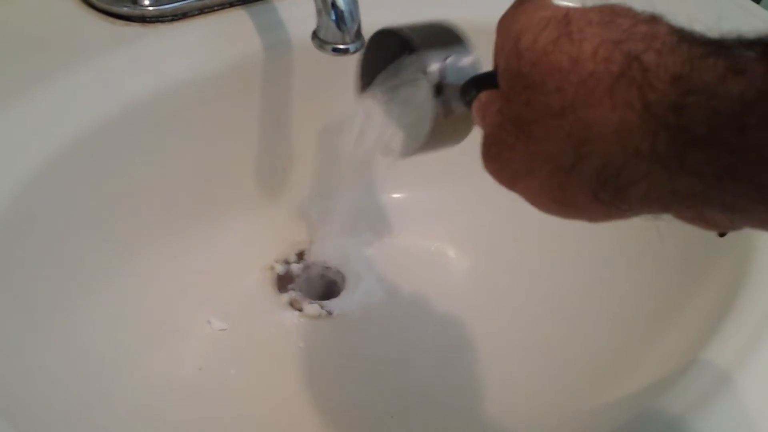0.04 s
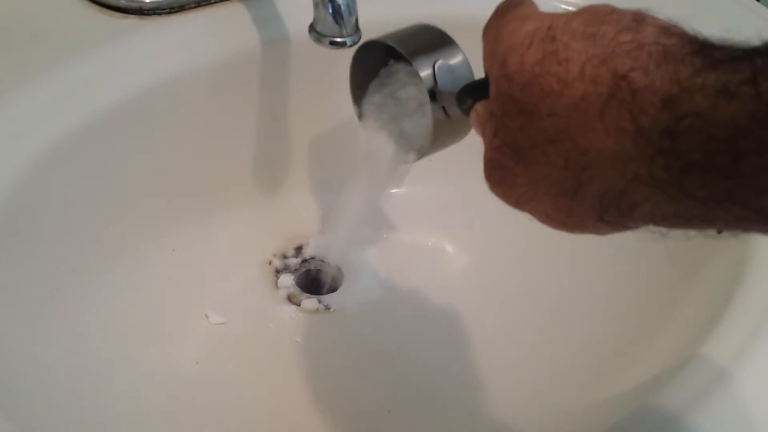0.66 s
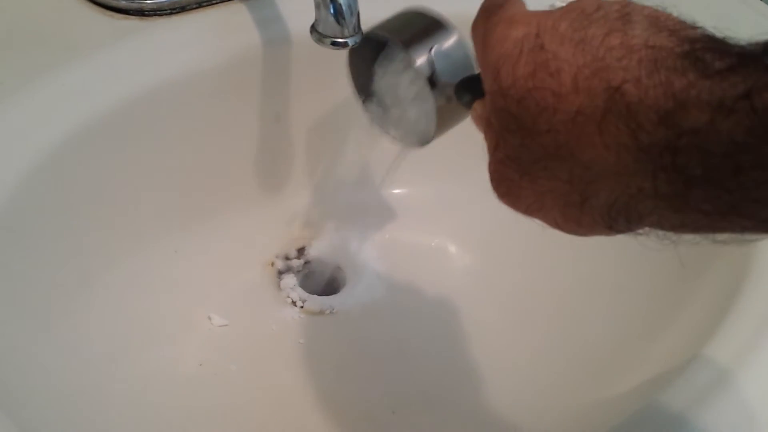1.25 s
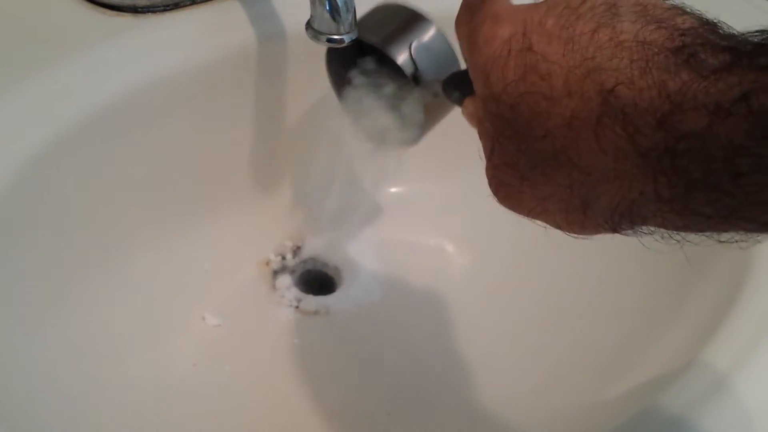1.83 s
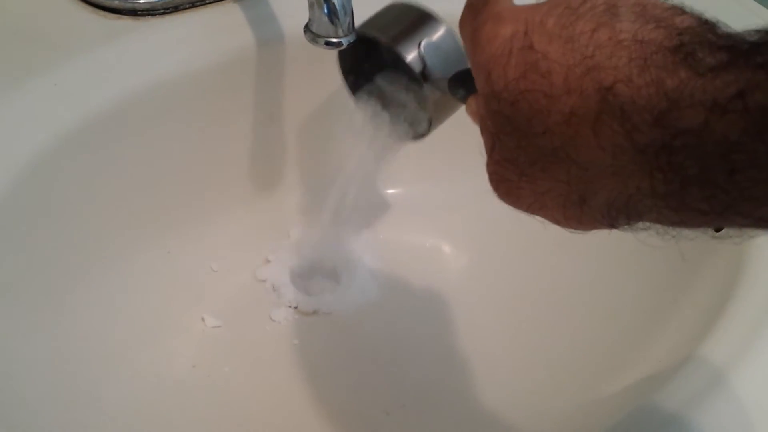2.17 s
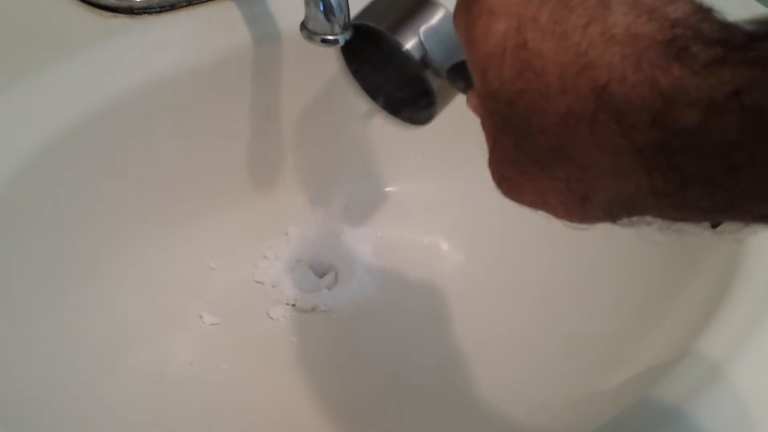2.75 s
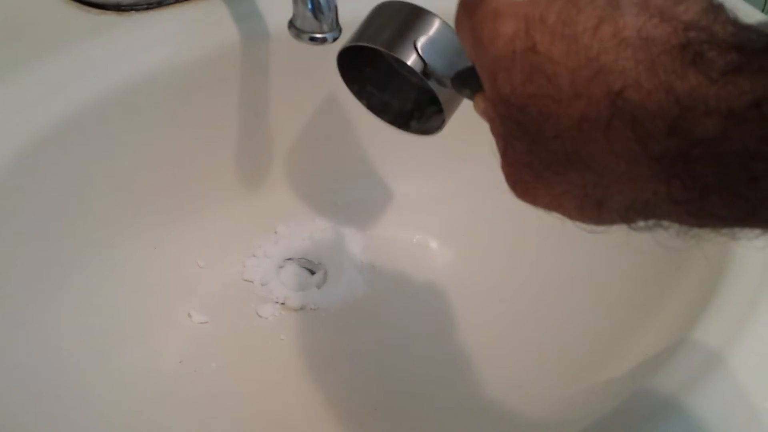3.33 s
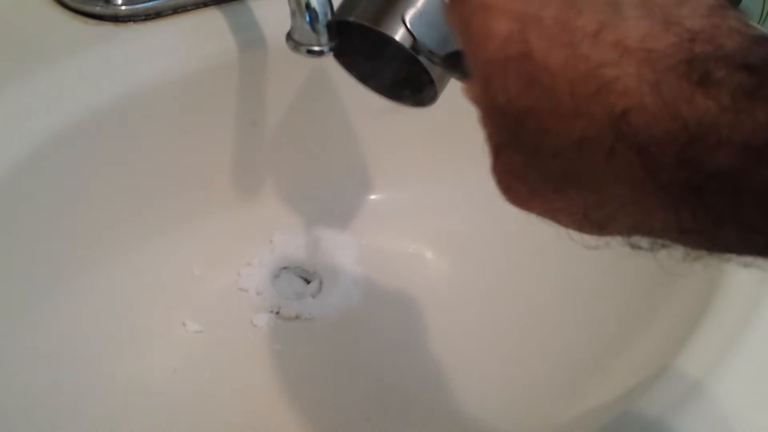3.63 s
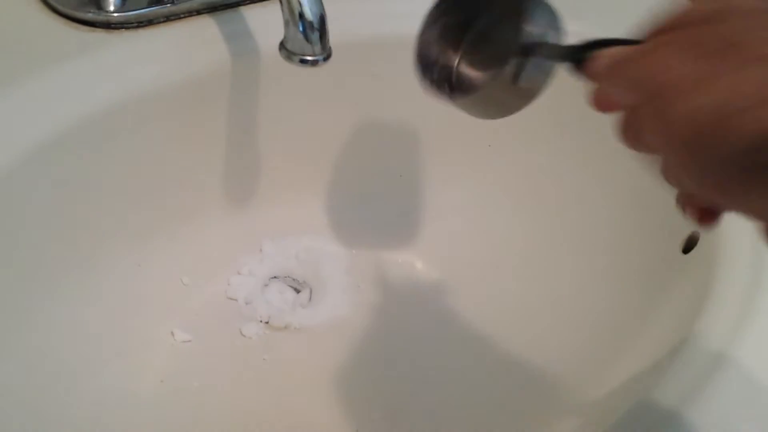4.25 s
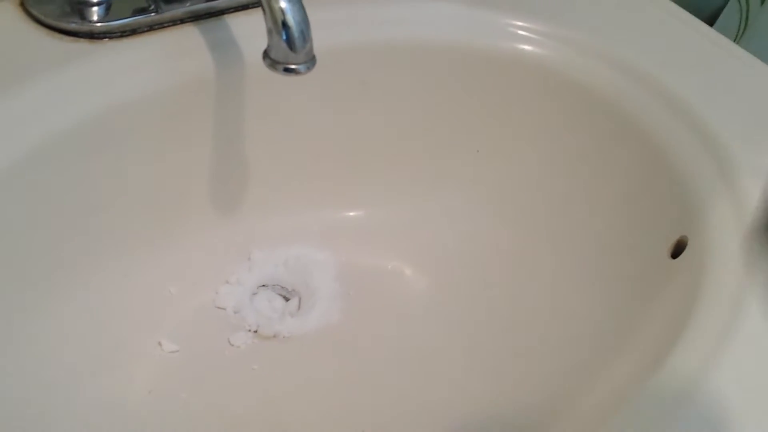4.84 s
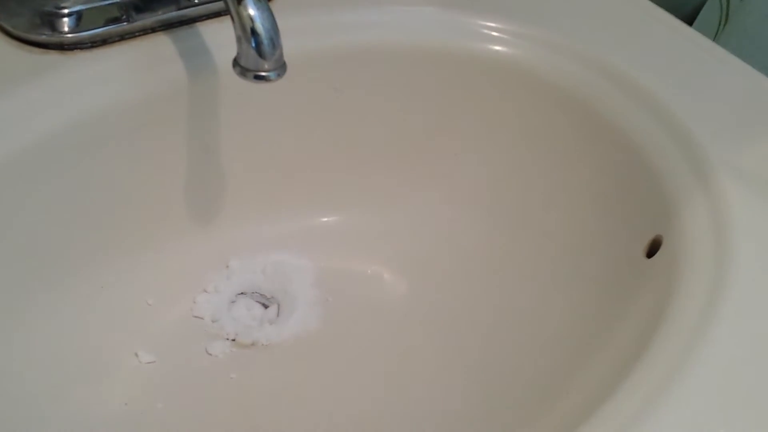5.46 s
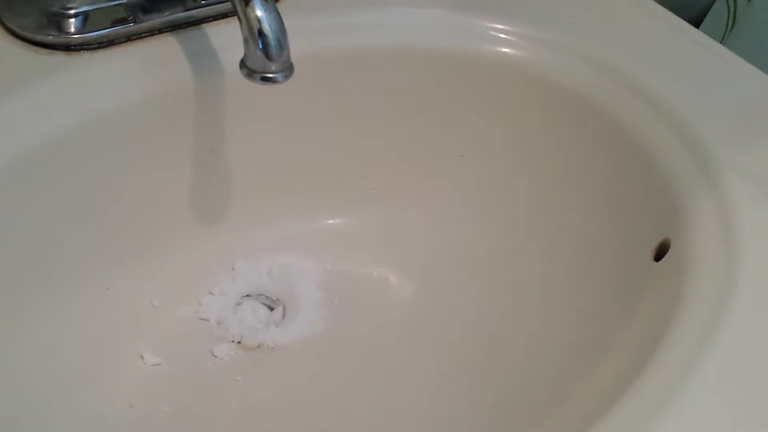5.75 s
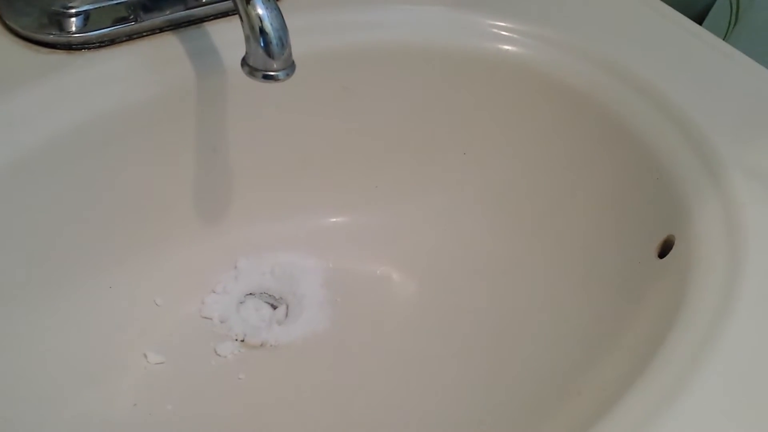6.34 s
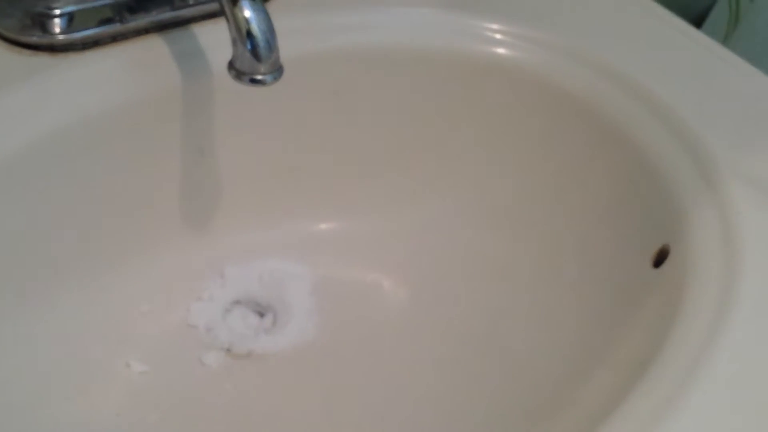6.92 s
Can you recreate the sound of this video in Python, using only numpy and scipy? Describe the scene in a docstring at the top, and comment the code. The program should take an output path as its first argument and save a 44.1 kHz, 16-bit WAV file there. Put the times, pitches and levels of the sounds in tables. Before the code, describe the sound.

Powder hisses faintly from a steel measuring cup, which is knocked four times on a tap with ringing clinks, then set on the counter.

```python
"""A bathroom sink in a small hard room, with a low ventilation hum and faint microphone hiss.
Powder shaken from a steel measuring cup hisses along the steel and patters into the basin.
Four knocks on the tap empty the cup: each clicks, rings the cup's modes and clanks tap and basin.
Set down on the counter, the cup clinks and rocks twice with a duller ring.
Basin and room answer every contact."""
import sys
import numpy as np
from scipy import signal
from scipy.fft import rfft, irfft, next_fast_len
from scipy.io import wavfile
from scipy.ndimage import map_coordinates

SR = 44100
rng = np.random.default_rng(int(sys.argv[2]) if len(sys.argv) > 2 else 0)


def to_wav(s):
    """Save 16-bit WAV."""
    ch = np.atleast_2d(s).T  # columns
    pcm = np.round(np.clip(ch, -1, 1) * 32767)  # PCM
    wavfile.write(sys.argv[1], SR, pcm.astype(np.int16))


N = 317114
EVENT_N = int(SR * .6)
AGE_S = np.arange(EVENT_N) / SR


def amp(db):
    """Decibels to gain."""
    return 10 ** (np.asarray(db) / 20)


def unit(x):
    """Scale to rms 1."""
    return x / np.sqrt(np.mean(x ** 2) + 1e-20)


def along(points, hz):
    """Interpolate (Hz, value) points on a log axis."""
    point_hz, values = np.transpose(points)
    return np.interp(np.log(hz + 1), np.log(point_hz + 1), values)


def tilted(spectrum, db_per_octave):
    """A colour (Hz to dB) sloped about 3 kHz."""
    return lambda hz: spectrum(hz) + db_per_octave * np.log2(np.clip(hz, 500, 10000) / 3000)


def band(centre_hz, octaves):
    """Colour of one band, 3 dB down at +/- octaves."""
    return lambda hz: -10 * np.log10(1 + (np.log2((hz + 1) / centre_hz) / octaves) ** 4)


def fade(t60_s):
    """Exponential decay, 60 dB down at t60_s."""
    return np.exp(-np.log(1000) * AGE_S / t60_s)


def pan(db):
    """Left and right gains of mean power 1."""
    gains = amp(np.array([db, -db]) / 2)
    return gains / np.sqrt(np.mean(gains ** 2, axis=0))


def add(track, start_s, sound):
    """Mix a sound in at start_s."""
    part = track[:, round(start_s * SR):][:, :sound.shape[-1]]
    part += sound[..., :part.shape[-1]]


def filtered(x, response):
    """Apply a frequency-dependent gain."""
    size = x.shape[-1]
    padded = next_fast_len(size + 8192)
    return irfft(rfft(x, padded) * response(np.fft.rfftfreq(padded, 1 / SR)), padded)[..., :size]


def wobble(rate_hz):
    """Two smooth random curves."""
    knots = rng.standard_normal((2, int(EVENT_N * rate_hz / SR) + 4))
    position = np.arange(EVENT_N) * rate_hz / SR
    return np.array([map_coordinates(row, [position], mode="nearest") for row in knots])


# Each row: frequency in Hz, left-right correlation 0-1.
COHERENCE = [(100, 0.94), (300, .9), (700, .55), (1400, 0), (5000, 0)]

def noise(size, colour):
    """Stereo noise of rms 1: alike in the bass, unrelated in the treble."""
    def mid_side_gains(hz):
        angle = np.arccos(np.clip(along(COHERENCE, hz), -1, 1)) / 2
        return amp(colour(hz)) * [np.cos(angle), np.sin(angle)]
    mid, side = filtered(rng.standard_normal((2, size)), mid_side_gains)
    return unit(np.array([mid + side, mid - side]))


def ring(modes, flutter_hz, weight_db=np.zeros_like, damping_db_per_s=0):
    """Decaying modes; reflections arriving out of step make each waver in level and phase."""
    out = np.zeros((2, EVENT_N))
    for hz, db, t60_s, rise_s, pan_db, waver in modes:
        alike = np.clip(along(COHERENCE, hz), 0, 1)
        left, other = (wobble(flutter_hz) + 1j * wobble(flutter_hz)) / np.sqrt(2)
        diffuse = np.array([left, alike * left + np.sqrt(1 - alike ** 2) * other])
        # short waves reach the two microphones out of step
        direct = np.exp(1j * (rng.uniform(0, 2 * np.pi) + np.arccos(alike) * np.array([[0], [1]])))
        phasor = np.sqrt(1 - waver ** 2) * direct + waver * diffuse
        tone = (phasor * np.exp(2j * np.pi * hz * AGE_S)).real
        damping = amp(-damping_db_per_s * (hz / 6000) ** 2 * AGE_S)
        envelope = fade(t60_s) * damping * (1 - np.exp(-AGE_S / rise_s))
        out += amp(db + weight_db(hz)) * pan(pan_db)[:, None] * envelope * tone
    return out


# Each row: frequency in Hz, room T60 in seconds.
ROOM_DECAY = [(100, 0.94), (500, 0.56), (2000, 0.33), (6000, 0.39), (14000, 0.073)]

def room_tail(colour):
    """Dense reflections; the treble dies first."""
    hz, t, spectra = signal.stft(noise(EVENT_N, colour), SR, nperseg=256)
    decay = np.exp(-np.log(1000) * t / along(ROOM_DECAY, hz)[:, None])
    return signal.istft(spectra * decay, SR, nperseg=256)[1][:, :EVENT_N]


def in_room(sound, wet_db):
    """A sound plus its reverberation."""
    tail = unit(room_tail(np.zeros_like)) / np.sqrt(EVENT_N)
    return sound + amp(wet_db) * signal.fftconvolve(sound, tail, axes=1)[:, :EVENT_N]


def puff(colour, t60_s):
    """A noise burst in the room."""
    return in_room(noise(EVENT_N, colour) * fade(t60_s), wet_db=-2) * pan(3)[:, None]


# Each row: frequency in Hz, left over right in dB.
BALANCE = [(100, 1.5), (380, 1.5), (1300, 3), (2400, 0.5), (5000, 4), (6800, -3), (8300, -8),
           (15000, -11.5)]

def placed(sound):
    """Pan by frequency: lows and mids left, top treble right."""
    return filtered(sound, lambda hz: pan(along(BALANCE, hz)))


def contact(colour, crack_t60_s, basin_db, room_db):
    """A hard click, its quick echoes in the basin, then the room."""
    crack = noise(EVENT_N, colour) * fade(crack_t60_s) * (1 - fade(0.00299))
    basin = noise(EVENT_N, colour) * fade(0.11) * (1 - fade(0.006))
    room = room_tail(colour) * (1 - fade(0.045))
    return placed(crack + amp(basin_db) * basin + amp(room_db) * room)


# Each row: frequency in Hz, relative density in dB.
HUM_SPECTRUM = [(20, -6.5), (40, -14.5), (62, -1), (90, -9.5), (125, -0.5), (150, -12), (174, 6.5),
                (198, -6.5), (235, 0), (290, -5.5), (450, -12), (800, -17.5), (1600, -25.5), (4000, -36)]
HISS_SPECTRUM = [(500, -20), (2000, -12.5), (4200, -10), (6000, -9), (7100, 0), (8200, -2.5), (9500, -9.5),
                 (12000, -13.5), (15300, -10.5), (15800, -40.5)]

def background():
    """Low ventilation hum and microphone hiss."""
    hum = amp(-59.5) * noise(N, lambda hz: along(HUM_SPECTRUM, hz)) * pan(2.2)[:, None]
    hiss = amp(-69.5) * noise(N, lambda hz: along(HISS_SPECTRUM, hz)) * pan(-.5)[:, None]
    return hum + hiss


# Each row: start in seconds, level in dB, centre in Hz, half-width in octaves, T60 in seconds.
FAINT_NOISES = [(.58, -71, 1440, 0.48, .86), (.71, -59.5, 1050, 0.22, .093), (1.183, -60, 1120, 0.27, .08),
                (1.342, -67, 1057, 0.038, 0.66), (1.36, -67.5, 2190, 0.42, 0.45),
                (3.301, -52.5, 997, 0.54, 0.02), (4.262, -56.5, 4900, 0.45, 0.12),
                (4.73, -62, 3996, 0.65, .08), (4.797, -51, 2920, .59, 0.019)]

def faint_noises():
    """Faint rubs and bumps of handling, and a narrow ring near 1 kHz, perhaps from the drain."""
    out = np.zeros((2, N))
    for start_s, db, centre_hz, octaves, t60_s in FAINT_NOISES:
        add(out, start_s, amp(db) * puff(band(centre_hz, octaves), t60_s))
    return out


# Each row: start in seconds, level in dB, tilt in dB per octave.
CLUMP_BREAKS = [(1.985, -49.5, .5), (2.059, -56.5, -4.5), (2.096, -52, 0), (2.123, -52, 1),
                (2.143, -57, 1.5), (2.314, -54, -5.5), (2.345, -55, -6), (2.615, -43.5, -2.5)]
# Each row: frequency in Hz, relative density in dB.
CLUMP_SPECTRUM = [(200, -7), (1000, -3), (3000, -4), (5000, -5), (7500, 9), (10000, -14), (15000, -25.5)]
# Each row: start in seconds, length in seconds.
CRUMB_FLURRIES = [(0.367, .14), (2.928, .14)]

def crumbs():
    """Clumps break on the basin; loose crumbs tick at random, three to a flurry."""
    out = np.zeros((2, N))
    for start_s, db, tilt in CLUMP_BREAKS:
        colour = tilted(lambda hz: along(CLUMP_SPECTRUM, hz), tilt)
        add(out, start_s, amp(db) * puff(colour, t60_s=0.0235))
    for start_s, length_s in CRUMB_FLURRIES:
        for tick_s in start_s + length_s * rng.random(size=3):
            db = rng.normal(-60, 1.5)
            add(out, tick_s, amp(db) * puff(band(centre_hz=7600, octaves=0.17), t60_s=0.014))
    return out


def grainy(spectrum, grain_db, rate_hz):
    """Noise whose level varies from grain to grain."""
    grains = rng.standard_normal(int(N * rate_hz / SR) + 4)
    sizes = map_coordinates(grains, [np.arange(N) * rate_hz / SR], order=1)
    return unit(noise(N, lambda hz: along(spectrum, hz)) * amp(grain_db * sizes))


# One slip of powder per shake, about eight a second. Each row: peak time in seconds, level in dB.
SLIPS = [(.93, -70), (1.035, -70), (1.29, -73), (1.41, -74), (1.552, -70), (1.685, -61), (1.827, -54),
         (1.936, -61.5), (2.074, -62), (2.19, -70), (2.325, -63.5)]

def powder_flow():
    """Gains of powder leaving and landing; a stream builds under the slips until the first knock."""
    slip_width_s, fall_s = 0.026, 0.15
    land_db, land_rise_s, land_decay_s = -2.5, 0.0117, .04
    stream_db, stream_start_s, stream_rise_s = -63, 1.55, 0.52
    t = np.arange(N) / SR
    leaving, landing = np.zeros(N), np.zeros(N)
    for peak_s, db in SLIPS:
        leaving += amp(db) * np.exp(-((t - peak_s) / slip_width_s) ** 2 / 2)
        landed_s = t - peak_s - fall_s
        swell = np.exp(-np.maximum(landed_s / land_decay_s, -landed_s / land_rise_s))
        landing += amp(db + land_db) * swell
    stream = amp(stream_db) * np.clip((t - stream_start_s) / stream_rise_s, 0, 1) * (t < KNOCKS[0][0])
    return leaving, np.hypot(landing, stream)


# The cup's five main mode frequencies in Hz.
CUP_MAIN_HZ = [1872, 3610, 5722, 5810, 6864]
# Each row: frequency in Hz, relative density in dB.
SLIDE_SPECTRUM = [(1200, -24.5), (2600, -11), (5000, -10.5), (6500, 1), (8500, -2.5), (11000, -8),
                  (14500, 1), (16000, -11)]
PATTER_SPECTRUM = [(150, -10.5), (600, 3), (1500, -2.5), (3000, -10.5), (7000, -10.5), (14000, -21)]

def powder():
    """Powder hisses along the steel, exciting its modes, and patters into the basin."""
    def steel(hz):
        peaks = zip(CUP_MAIN_HZ, [24, 2, 3, 5.8, 12])
        return 1 + sum(amp(db) / (1 + ((hz - mode_hz) / 40) ** 2) for mode_hz, db in peaks)
    leaving, landing = powder_flow()
    slide = leaving * unit(filtered(grainy(SLIDE_SPECTRUM, grain_db=2.5, rate_hz=820), steel))
    patter = landing * grainy(PATTER_SPECTRUM, grain_db=3.0, rate_hz=480)
    return placed(slide + patter)


# Each row: start in seconds, level in dB.
SINK_BLOWS = [(1.991, -47.5), (2.06, -52.5), (2.126, -50.5), (2.4566, -19.5), (3.544, -38), (3.772, -35),
              (3.961, -36.5), (5.982, -45.5), (6.138, -47), (6.158, -50)]
# Each row: frequency in Hz, level in dB, T60 and rise in seconds, left over right in dB, waver 0-1.
SINK_MODES = [(109, -4.5, 0.25, .02, 0, .5), (127, -9.5, .28, 0.0042, 0.5, .6),
              (175.9, -10, .22, 0.0023, -2, 0.3), (225, -6, .33, 0.0033, -0.5, .6),
              (248.7, -4.5, 0.096, 0.00089, -2, 0.51), (286.9, -7.5, 0.22, 0.0014, 0.5, 0.1)]

def sink_thuds():
    """Dull blows reach the sink body, which booms briefly."""
    out = np.zeros((2, N))
    for start_s, db in SINK_BLOWS:
        add(out, start_s, amp(db) * ring(SINK_MODES, flutter_hz=41))
    return out


# Each row: start in seconds, contact level in dB, tilt in dB per octave, ring level in dB,
# extra damping at 6 kHz in dB per second.
COUNTER_CONTACTS = [(5.755, -51, 4.5, -57, -3), (5.9802, -14.5, 2, -16, -12),
                    (6.227, -40.5, -7, -61.5, 305), (6.2548, -33.5, -4, -32.5, 800),
                    (6.4076, -24.5, -1.5, -19, 1500)]
# Each row: frequency in Hz, relative density in dB.
COUNTER_CLICK_SPECTRUM = [(40, -12), (200, -12.5), (600, -7), (1300, -2.5), (1780, 6), (2100, -1.5),
                          (3400, -2.5), (4600, -12), (5750, -10.5), (6600, -13.5), (8400, -12),
                          (9300, -22.5), (15000, -32)]
# Each row: frequency in Hz, level in dB, T60 and rise in seconds, left over right in dB, waver 0-1.
COUNTER_MODES = [(570, -25, 0.28, .003, 4, 0.3), (773, -30, 0.4, .003, 3, 0.4),
                 (862, -26.5, 0.23, 0.0015, 11.5, 0.2), (1002, -17.5, 0.22, 0.0018, 0, 0.5),
                 (1317, -19.5, .22, 0.00218, 13.5, 0.2), (1560, -19.5, .2, .002, 11, .4)]
RESTING_CUP_MODES = [(1694, -6.5, .19, .001, 7, .4), (1830, -2, .2, .001, 5, .5),
                     (1870, -4.5, .3, .001, 6, .4), (5688, -3, .16, .001, 8, .55),
                     (5790, -2, .15, .001, 10, .5), (2745, -13, .15, .001, 1, .6),
                     (3130, -16, .15, .001, 6, .5), (3520, -8.5, .14, .001, 8, .6),
                     (3630, -13, .2, .001, 7, .5), (6840, -22, .17, .001, 0, .6),
                     (8410, -15, .18, .002, -7, .85), (10090, -22, .17, .001, -7, .9),
                     (11450, -32, .17, .001, -7, .9), (12780, -35, .23, .001, -8, .9),
                     (13450, -35, .23, .001, -8, .9), (14390, -34, .23, .001, -8, .9),
                     (15350, -35, .23, .001, -8, .9)]

def cup_on_counter():
    """The cup lands and rocks; the rocking is duller, as the counter damps the high modes."""
    out = np.zeros((2, N))
    for start_s, db, tilt, ring_db, damping_db_per_s in COUNTER_CONTACTS:
        colour = tilted(lambda hz: along(COUNTER_CLICK_SPECTRUM, hz), tilt)
        click = contact(colour, crack_t60_s=0.016, basin_db=-6.5, room_db=-14)
        slab = ring(COUNTER_MODES, flutter_hz=50)
        weight_db = lambda hz: ring_db + tilt * np.log2(hz / CUP_MAIN_HZ[0])
        cup = ring(RESTING_CUP_MODES, flutter_hz=130, weight_db=weight_db,
                   damping_db_per_s=max(damping_db_per_s, 0))
        add(out, start_s, amp(db) * (click + slab) + in_room(cup, wet_db=-15.5))
    return out


# Four knocks, two rebounds. Each row: start in seconds, contact level in dB, powder load 0-1,
# then a gain in dB for each of the five main modes.
KNOCKS = [(2.4565, -13.5, 1, -32, -26, -23.5, -21, -17.5), (3.5426, -10.5, 0.18, -13, -13.5, -21, -7.5, -7),
          (3.7702, -8.5, 0.031, -15, -15.5, -15.5, -22, -12),
          (3.7900, -24, 0, -29.5, -28, -42, -37.5, -9.5), (3.9612, -12, 0.095, -15, -16.5, -12.5, -31, -19),
          (3.9760, -16, 0.025, -9.5, -34.5, -42, -42, -4.5)]
# Each row: frequency in Hz, relative density in dB.
LADEN_CLICK_SPECTRUM = [(50, -38), (150, -7.5), (420, -9), (900, -12.5), (1300, -2), (2100, -16.5),
                        (3100, -18.5), (3600, 3.5), (4300, -20.5), (5000, -13.5), (5450, 3.5),
                        (6150, -17.5), (7000, 3.5), (8600, -12.5), (11000, -27.5), (14800, -14)]
EMPTY_CLICK_SPECTRUM = [(45, -47.5), (110, -17), (330, -9), (490, -3), (900, -10), (1800, -1), (2600, -8.5),
                        (3550, 1), (4500, -13), (6000, -11.5), (6900, -0.5), (8000, -20), (11000, -34.5),
                        (14500, -25.5)]
# Each row: frequency in Hz, level in dB, T60 and rise in seconds, left over right in dB, waver 0-1.
TAP_BASIN_MODES = [(260, -23.5, 0.41, 0.0064, 1, 0.2), (484, -16, 0.27, 0.0017, 3.5, 0.9),
                   (523, -21.5, 0.33, 0.0026, 0.5, .3), (592, -21, .33, 0.0023, 2, 0),
                   (692, -25, 0.23, 0.0033, 3, .3), (864, -23, 0.23, 0.00093, 6, 0),
                   (1572, -17.5, .24, 0.0023, 4.5, 0.47), (1720, -25.5, .2, 0.0022, 3, .6)]
FREE_CUP_MODES = [(1875, 0, .32, .006, 8, .4), (3615, -2, .28, .001, 7, .45), (6864, -1, .22, .005, 1, .35),
                  (5723, -3.5, .35, .025, 3, .15), (5810, -3.5, .35, .02, 8, .15),
                  (3470, -8, .17, .001, 5, .7), (3815, -14, .18, .001, 6, .7),
                  (5400, -20, .18, .001, 6, .8), (6570, -17, .19, .002, 6, .9),
                  (7245, -21, .16, .002, -2, .8), (8467, -23, .26, .002, -8, .3),
                  (8940, -28, .18, .001, -4, .9), (10170, -27, .17, .001, -9, .9),
                  (11500, -32, .19, .001, -9, .8), (12290, -25, .18, .001, -9, .8),
                  (12770, -26, .18, .001, -9, .85), (13655, -27, .17, .001, -9, .85),
                  (14400, -28, .18, .001, -10, .85), (14530, -29, .18, .001, -10, .85),
                  (15080, -25, .19, .001, -10, .75)]

def cup_on_tap():
    """Tap and basin clank and the cup rings freely; the spot struck decides which modes speak."""
    out = np.zeros((2, N))
    for start_s, db, load, *main_db in KNOCKS:
        def colour(hz):
            return load * along(LADEN_CLICK_SPECTRUM, hz) + (1 - load) * along(EMPTY_CLICK_SPECTRUM, hz)
        click = contact(tilted(colour, 0.5), crack_t60_s=0.03, basin_db=-6, room_db=-13)
        clank = amp(-14 * load) * ring(TAP_BASIN_MODES, flutter_hz=41)
        # overtones above the main modes follow the strength of the blow
        weight_db = lambda hz: np.interp(hz, CUP_MAIN_HZ + [8400], main_db + [db])
        cup = ring(FREE_CUP_MODES, flutter_hz=140, weight_db=weight_db)
        add(out, start_s, amp(db) * (click + clank) + cup)
    return out


def scene():
    """Everything heard at the sink."""
    cup = cup_on_tap() + cup_on_counter()
    return cup + sink_thuds() + faint_noises() + crumbs() + powder() + background()


def record(dry):
    """The recorder thins the deepest bass, rounds the highest peaks and limits the band."""
    low_cut_hz, ceiling, top_hz = 45, .95, 15700
    thinned = signal.sosfilt(signal.butter(2, low_cut_hz, "highpass", fs=SR, output="sos"), dry)
    rounded = thinned / (1 + np.abs(thinned / ceiling) ** 6) ** (1 / 6)
    return filtered(rounded, lambda hz: 1 / np.sqrt(1 + (hz / top_hz) ** 160))


dry = scene()
out = record(dry)
to_wav(out)
```